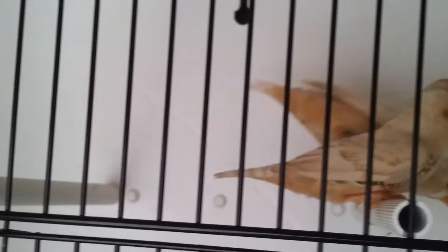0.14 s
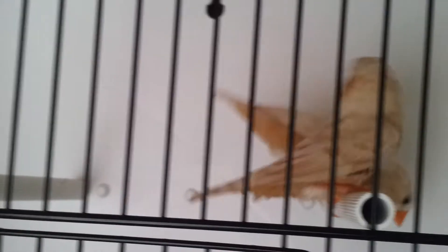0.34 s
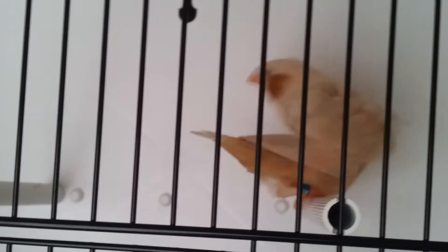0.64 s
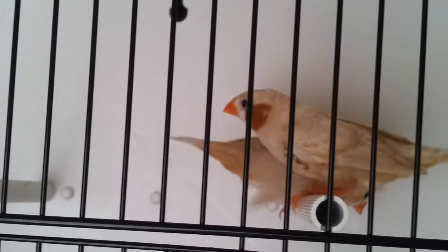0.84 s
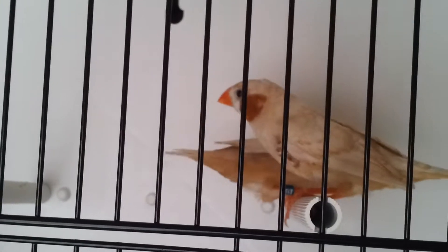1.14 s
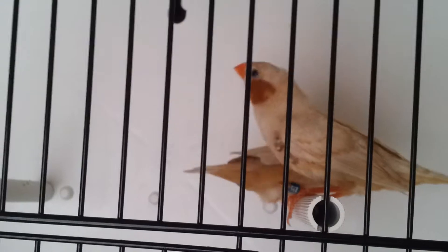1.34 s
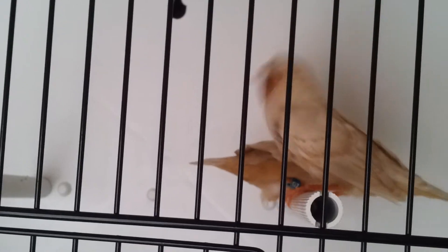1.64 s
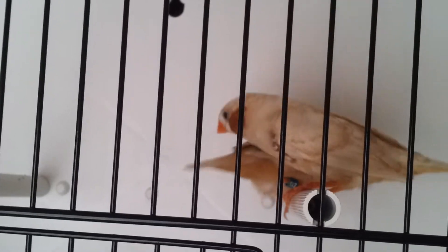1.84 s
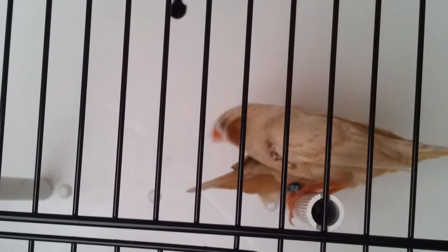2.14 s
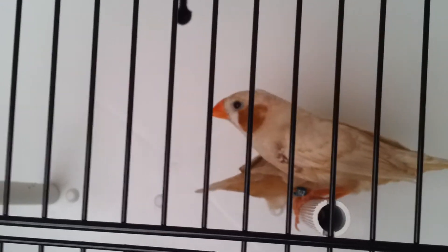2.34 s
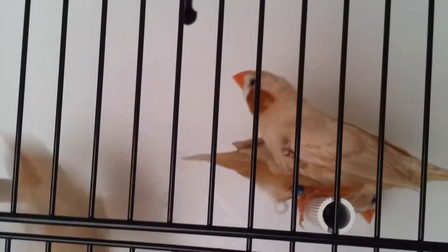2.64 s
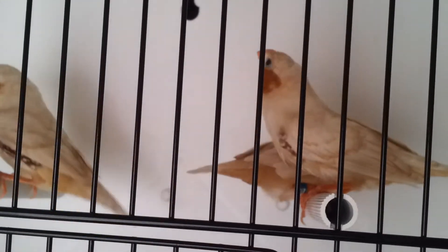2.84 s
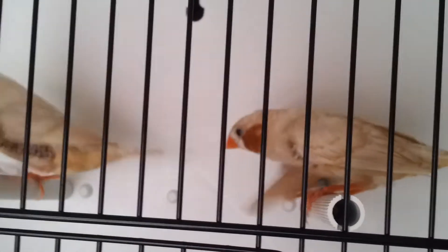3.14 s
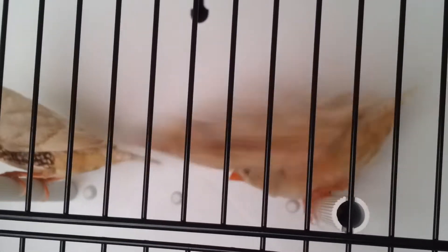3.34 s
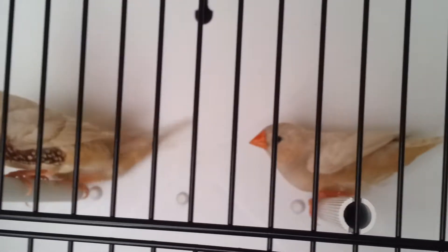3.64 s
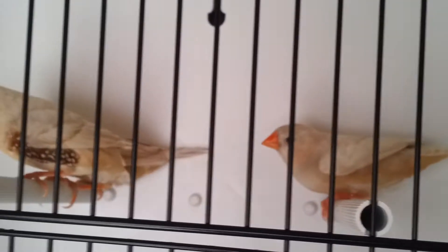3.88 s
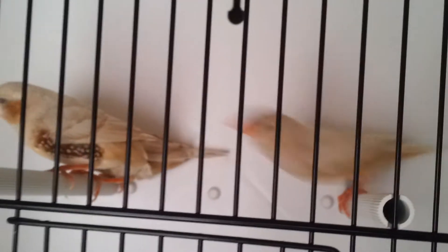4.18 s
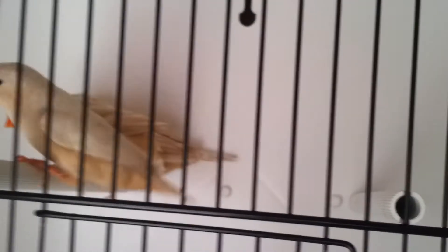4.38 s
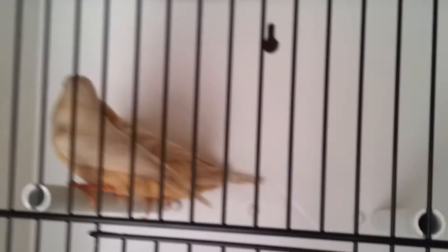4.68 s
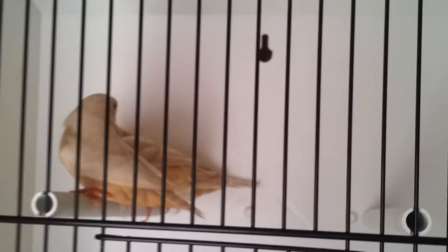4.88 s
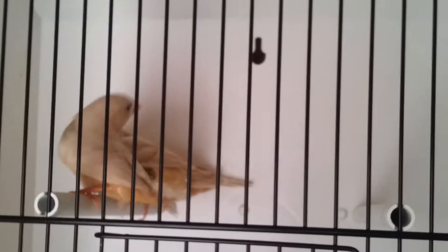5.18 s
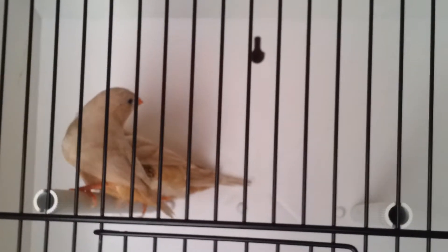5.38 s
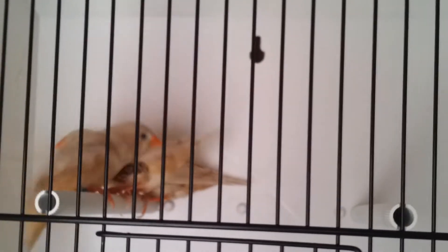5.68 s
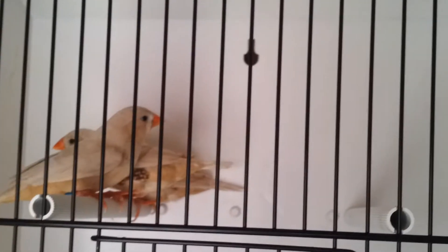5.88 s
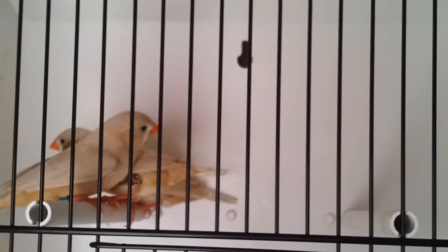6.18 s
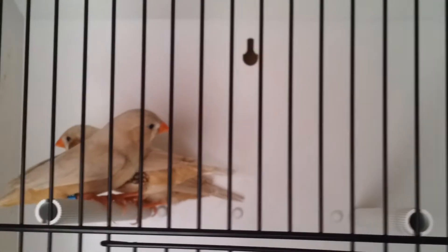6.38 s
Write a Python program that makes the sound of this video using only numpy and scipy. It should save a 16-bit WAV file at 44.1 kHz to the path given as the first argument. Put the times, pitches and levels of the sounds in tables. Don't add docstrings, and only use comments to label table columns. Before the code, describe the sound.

Small birds in a wire cage call nasally and flutter between plastic perches, a shrill young bird begging loudest at the end, close up in a quiet room.

```python
import sys
import numpy as np
from scipy import signal
from scipy.fft import rfft, irfft, next_fast_len
from scipy.io import wavfile
from scipy.ndimage import uniform_filter1d, map_coordinates

SR = 44100
rng = np.random.default_rng(int(sys.argv[2]) if len(sys.argv) > 2 else 0)


def volts(x):
    e = np.asarray(x, float) / 20
    return 10 ** e


def put_to_file(sound):
    columns = np.atleast_2d(sound).T
    safe = np.clip(columns, -1, 1)
    whole_steps = np.round(safe * 32767)
    wavfile.write(sys.argv[1], SR, whole_steps.astype(np.int16))


N = 287532


def unit(x):
    return x / np.sqrt(np.mean(x ** 2) + 1e-20)


def along(points, hz):
    f, v = np.transpose(points)
    return np.interp(np.log(np.abs(hz) + 1), np.log(f + 1), v)


def wobble(rate, size, count=1):
    knots = rng.standard_normal((count, int(size * rate / SR) + 4))
    places = np.arange(size) * rate / SR
    return np.array([map_coordinates(k, [places]) for k in knots])


def noise(size, gain):
    m = next_fast_len(size + 64)
    spectrum = rfft(rng.standard_normal(m)) * gain(np.fft.rfftfreq(m, 1 / SR))
    return unit(irfft(spectrum, m)[:size])


def bump(hz, centre, width, power=2):
    return np.exp(-((hz - centre) / width) ** power)


def spread(rows, fade):
    s, *cols = np.transpose(rows)
    t = np.arange(s[0] - fade / 2, s[-1] + fade / 2, 1 / SR)
    edge = np.clip(np.minimum(t - t[0], t[-1] - t) / fade, 0, 1)
    return round(t[0] * SR), edge, [np.interp(t, s, c) for c in cols]


def add(track, start, sound):
    track[start:start + len(sound)] += sound[:len(track) - start]


# (frequency [Hz], density [dB per Hz])
AIR = [(90, -2), (150, 1), (220, -5.5), (470, -6.5), (560, -11.5), (650, -9), (900, -12.5), (1300, -15),
       (2100, -25), (3300, -24.5), (6000, -24.5), (8500, -27.5), (11700, -26), (15000, -90)]
# (time [s], feather level [dB])
STIR = [(0, -49), (.6, -84), (1.3, -48), (2.9, -56.5), (4.7, -58), (5.1, -66), (5.4, -40), (6.52, -44)]
# (time [s], level [dB], lean from first to second order [dB])
HUM = [(0, -47, 0.5), (.5, -52.5, -1.5), (1.1, -52, 1.5), (2, -51, -1), (2.598, -48, 0), (3.5, -42, -3),
       (4.1, -52.5, -7), (4.8, -51, 8.5), (6.52, -48.5, -1)]
# (frequency [Hz], relative unsteadiness, level [dB], answer to the lean)
HUM_ORDERS = [(40, 0.05, 1.5, -1), (80, 0.045, 1.5, 1), (117, 0.037, -1, 0)]


def background():
    t = np.arange(N) / SR
    out = volts(-47 + 0.25 * wobble(27, N)[0]) * noise(N, lambda f: volts(along(AIR, f)))
    stir_db = np.interp(t, *np.transpose(STIR)) - 4.5 + 4 * wobble(11, N)[0]
    out += volts(stir_db) * noise(N, lambda f: bump(f, 6000, 1500))
    out += volts(-55) * noise(N, lambda f: (f > 18) / (1 + (f / 170) ** 4))
    s, load_db, lean_db = np.transpose(HUM)
    for hz, drift, db, leans in HUM_ORDERS:
        phase = 2 * np.pi * np.cumsum(hz * (1 + drift * wobble(20, N)[0])) / SR
        order_db = np.interp(t, s, load_db + leans * lean_db) + db + 3 * wobble(7, N)[0]
        out += volts(order_db) * np.sin(phase)
    return out


# (frequency [Hz], t60 [s])
ROOM = [(300, 0.35), (2500, 0.16), (10000, 0.016)]


def room(x):
    out, step = np.zeros(N), SR // 8
    for start in range(0, N, step):
        hz, t, z = signal.stft(rng.standard_normal(SR // 3), SR, nperseg=256)
        decay = volts(-60 * t / along(ROOM, hz)[:, None])
        tail = signal.istft(z * decay, SR, nperseg=256)[1]
        add(out, start, signal.fftconvolve(x[start:start + step], tail / np.linalg.norm(tail)))
    return out


# (time [s], peak [dB], low scuff over swish [dB])
RUSTLES = [(0.0144, -16, -4.5), (0.122, -24, -24), (0.379, -32.5, -24), (0.9, -27.5, 1), (0.982, -23, -2),
           (1.1756, -13.5, -2), (1.483, -17, -4.5), (1.769, -31, 9.5), (2.6933, -27, 5.5),
           (2.8702, -29, -20), (3.117, -18.5, -2.5), (3.196, -28, 1), (3.366, -22.5, -14),
           (3.414, -19, -4.5), (3.6113, -32, -31), (3.8278, -26.5, -3.5), (4.2435, -31, -19),
           (4.2749, -27.5, -6), (4.314, -29, -13), (4.362, -29.5, -13), (6.4173, -29, -6)]


def rustles():
    out, t = np.zeros(N), np.arange(SR // 3) / SR
    for s, db, low_db in RUSTLES:
        swish = noise(len(t), lambda f: bump(f, 6800, 3300))
        scuff = noise(len(t), lambda f: bump(f, 1900, 1300))
        onset = 1 - np.exp(-t / 0.0018)
        grain = volts(2.05 * wobble(557, len(t))[0] - 60 * t / 0.17) * onset
        add(out, round(s * SR), volts(db - 16.5) * grain * (swish + volts(low_db) * scuff))
    return out


# (time [s], peak [dB], pitch [Hz])
BUMPS = [(0.049, -30.5, 336), (0.328, -28, 353), (0.708, -22.5, 359), (0.983, -26.5, 298), (1.18, -27, 374),
         (1.485, -31, 326), (1.771, -20.5, 329), (2.666, -22.5, 424), (3.159, -26.5, 415),
         (3.218, -28.5, 367), (3.313, -28.5, 341), (3.441, -21, 400), (3.678, -33.5, 434),
         (3.755, -31.5, 312), (4.16, -32.5, 535), (4.216, -29.5, 370), (4.286, -32, 417), (4.313, -23, 283),
         (4.42, -27, 252), (5.589, -20.5, 375), (5.65, -24, 428), (5.722, -31, 393)]
# (time [s], peak [dB], pitch [Hz], t60 [s])
THUMP = (4.42, -22, 245, .07)


def perches():
    out, t = np.zeros(N), np.arange(SR // 3) / SR
    for s, db, hz in BUMPS:
        thud = noise(len(t), lambda f: bump(f, hz, 75) + 0.52 * bump(f, 370, 110, power=4))
        envelope = volts(db - 6.5 - 60 * t / 0.12) * (1 - np.exp(-t / 0.0046))
        add(out, round(s * SR) - 150, envelope * (thud + 0.68 * np.sin(2 * np.pi * hz * t)))
    s, db, hz, t60 = THUMP
    add(out, round(s * SR), volts(db - 60 * t / t60) * np.sin(2 * np.pi * hz * t))
    return out


# (frequency [Hz], level [dB], t60 [s])
WIRES = [(272, -14, 1.34), (595, -23.5, 0.57), (1182, -5, 0.084), (1450, -42, 0.16), (1857, -37, 0.38)]
# (time [s], peak [dB], share of wire ring [dB])
LANDINGS = [
    (0.983, -8.5, -7.5),
    (4.162, -31, -7),
    (4.313, -19.5, -15),
    (4.421, -15.5, -16),
]


def landings():
    out, t = np.zeros(N), np.arange(SR // 3) / SR
    for s, db, ring_db in LANDINGS:
        ring = np.zeros(len(t))
        for hz, level, t60 in WIRES:
            sway = 0.54 * wobble(28.4, len(t))[0]
            ring += volts(level - 60 * t / t60) * np.sin(2 * np.pi * hz * t + sway)
        crack = 0.38 * volts(-60 * t / 0.058) * noise(len(t), lambda f: 1 / (1 + (f / 1800) ** 2))
        add(out, round(s * SR), volts(db - 7) * (volts(ring_db) * ring + crack))
    return out


def syrinx(rows, throat, rough, strain, beak_db=0, beak_hz=1200):
    start, edge, (pitch, db, *beak) = spread(rows, .008)
    size, pitch = len(edge), uniform_filter1d(pitch, 400, mode="nearest")
    glide = np.abs(np.gradient(np.log(pitch)) * SR)
    rough = np.clip(rough + strain * glide, 0, .6)
    phase = 2 * np.pi * np.cumsum(pitch * (1 + 0.06 * rough * wobble(341, size)[0])) / SR
    k = np.arange(1, 23)[:, None]
    colour = along(throat, k * pitch) + sum(beak_db * bump(k * pitch, hz, beak_hz) for hz in beak)
    drift = (1.6 + k / 6) * wobble(60, size, count=22)
    gains = volts(colour + drift) * (k * pitch < SR / 3)
    tone = np.sum(gains * np.sin(k * phase + k * k / 3), 0) / np.sqrt(np.sum(gains ** 2, 0) / 2)
    breath = noise(size, lambda hz: volts(along(throat, hz))) * (1 + 0.15 * np.cos(phase))
    return start, edge * volts(db) * (np.sqrt(1 - rough) * tone + np.sqrt(rough) * unit(breath))


def arch(top, bend, size=24):
    u = np.linspace(0, 1, num=size)
    return u, np.clip(1 - u / top, 0, 1) ** bend, np.clip((u - top) / (1 - top), 0, 1) ** bend


def arched_call(s, length, top, db, beak):
    u, early, late = arch(0.635, 2.09)
    pitch = top * (1 - (1 - .91) * early - (1 - .94) * late)
    soft = np.clip(1 - length * u / 0.017, 0, 1)
    return np.transpose([s + length * u, pitch, db - 4 * soft - 15 * late, beak + 0 * u])


# (time [s], length [s], top pitch [Hz], level [dB], beak resonance [Hz])
MATES = [(0.057, 0.073, 563.5, -33, 2500), (0.652, .07, 561.6, -33.5, 3060), (0.896, 0.077, 526, -33, 3940),
         (3.04, 0.062, 530, -54.5, 2110), (3.235, 0.044, 545, -37.5, 2820),
         (3.745, 0.082, 529.7, -33.5, 2850), (4.994, 0.096, 570, -40.5, 3450),
         (5.247, 0.1, 530.4, -36, 3200)]
# (frequency [Hz], gain [dB])
MATE_THROAT = [(280, -37), (530, -10), (1060, -5.5), (1600, -7.5), (2700, -3.5), (4300, -6.5), (5500, -3.5),
               (7500, -19.5), (11700, -36.5), (15000, -70)]


def mates():
    out = np.zeros(N)
    for row in MATES:
        add(out, *syrinx(arched_call(*row), MATE_THROAT, rough=0.052, strain=0.026,
                         beak_db=10.5, beak_hz=1070))
    return out


def cry(row, top, soft_db, fade_db, bend, lead_db, sag, sag_share=.22):
    s, length, db, upper_db, hz = row
    u, early, late = arch(top, bend)
    pitch = hz * (1 - sag * np.tanh((u - top) / sag_share))
    level = db - soft_db * early - fade_db * late
    return np.transpose([s + length * u, level, upper_db + lead_db * early, pitch])


# (frequency [Hz], density [dB per Hz])
HARSH = [(470, -45), (800, -37), (1060, -15.5), (1450, -4.5), (1790, -12), (3110, 2), (3360, 7.5),
         (5200, 3), (11700, -27.5), (15200, -83), (22000, -120)]


def screech(rows, scale, jitter, sag, gap_db, hiss_db, half_db, low_db=0):
    start, edge, (db, upper_db, hz) = spread(rows, .014)
    size = len(edge)
    snaps = np.cumsum(45 * volts(2.8 * wobble(39, size)[0])) / SR % 1
    slips = sag * (.5 - snaps) + jitter * wobble(489.3, size)[0]
    phase = 2 * np.pi * np.cumsum(hz * scale * (1 + slips)) / SR
    puffs = volts(1.2 * wobble(150, size)[0]) * (1 + .7 * np.cos(phase / 5))

    def line(order):
        gaps = volts(-gap_db * wobble(225.4, size)[0] ** 2)
        return unit(gaps * np.sin(order * phase))

    def hiss(side):
        return volts(hiss_db) * unit(puffs * noise(size, lambda f: volts(along(HARSH, f)) * side(f)))

    def below(f):
        return 1 / (1 + (f / 4000) ** 8)

    low = volts(low_db) * line(1) + volts(half_db) * line(1.5) + volts(half_db - 14) * line(.5)
    low += hiss(below)
    high = line(2) + volts(half_db - 5) * line(2.5) + volts(-18) * line(3)
    high += hiss(lambda f: 1 - below(f))
    return start, edge * volts(db) * (unit(low) + volts(upper_db) * unit(high))


# (time [s], length [s], level below 4 kHz [dB], overtone band over it [dB], pitch [Hz])
HOARSE = [(1.13, 0.037, -35.5, -8, 3260), (1.195, 0.1, -26, -27, 3030), (1.877, 0.064, -29.5, -12, 2930),
          (2.256, 0.059, -25.5, -5.5, 3360), (2.558, 0.067, -32.5, -7.5, 2930),
          (2.918, 0.06, -25.5, -7, 2980), (3.11, 0.034, -28.5, -14, 3730), (3.27, 0.065, -21, -8, 3020),
          (4.586, 0.02, -19, -30, 2656), (4.811, 0.069, -27.5, -9.5, 3040),
          (5.096, 0.065, -30, -12.5, 3214), (5.35, 0.078, -29.5, -6.5, 3176),
          (5.411, 0.061, -30.5, -9, 3510), (6.054, 0.049, -19, -10, 3530)]


def hoarse_notes():
    out = np.zeros(N)
    for row in HOARSE:
        rows = cry(row, top=0.37, soft_db=15, fade_db=25.5, bend=1.43, lead_db=4, sag=0.022)
        add(out, *screech(rows, 1, jitter=.022, sag=.04, gap_db=4, hiss_db=1, half_db=-4))
    return out


# (time [s], length [s], level below 4 kHz [dB], overtone band over it [dB], overtone [Hz])
BEGS = [(1.604, 0.12, -46.5, 10, 4830), (1.83, 0.08, -44, 14, 5560), (0.235, 0.091, -25.5, 1.5, 5100),
        (0.596, 0.11, -26.5, 3, 5210), (1.481, 0.15, -30, 7.5, 5100), (1.942, 0.091, -23.5, -1, 5234),
        (2.46, 0.1, -23, 0.5, 5226), (3.884, 0.088, -29, 6.5, 5620), (5.02, 0.086, -37, 7.5, 5510),
        (5.397, 0.16, -29.5, 0, 5730), (5.472, 0.089, -21, 12.5, 5620), (5.69, 0.11, -25.5, 10.5, 5350),
        (5.909, 0.13, -25, 14.5, 5506), (6.239, 0.12, -22.5, 14, 5600)]


def fledglings():
    out = np.zeros(N)
    swell = dict(top=0.35, soft_db=14.5, fade_db=31, lead_db=1)
    for row in BEGS[:10]:
        rows = cry(row, bend=1.66, sag=.12, **swell)
        add(out, *screech(rows, .5, jitter=.035, sag=.08, gap_db=7, hiss_db=-2, half_db=-6, low_db=-2))
    for row in BEGS[10:]:
        rows = cry(row, bend=1.96, sag=.05, **swell)
        add(out, *screech(rows, .5, jitter=.035, sag=.07, gap_db=5, hiss_db=-6, half_db=-11, low_db=-8))
    return out


def falling_note(s, length, held, top, db):
    t = np.linspace(0, length, num=40)
    early, late = np.clip(1 - t / .009, 0, 1), np.clip(t - held, 0, 1)
    broken = (t - held) / .004
    dip_db = 4 * np.exp(-broken ** 2)
    slide_db = 6 * (1 + np.tanh(broken + 1)) / 2
    fade_db = 60 * late
    pitch = top * (1 - (1 - .96) * early) * np.exp(-10.3 * late)
    return np.transpose([s + t, pitch, db - 12 * early - (dip_db + slide_db + fade_db)])


# (time [s], length [s], held [s], held pitch [Hz], level [dB])
FALLS = [
    (1.308, 0.05, .02, 938, -8.5),
    (1.359, 0.083, .023, 939, -9.5),
    (4.426, 0.044, .018, 914, -10),
    (4.479, .082, .019, 919, -11.5),
]
# (frequency [Hz], gain [dB])
FALL_THROAT = [(500, -28), (900, -24.5), (1850, -24.5), (2750, -11.5), (3700, -2.5), (4600, -7.5),
               (5500, -6), (6500, -23), (8000, -35.5), (11500, -36.5), (15000, -103)]


def falling_notes():
    out = np.zeros(N)
    for row in FALLS:
        add(out, *syrinx(falling_note(*row), FALL_THROAT, rough=.06, strain=.013))
    return out


def nasal_call(s, length, held, top, db):
    t = np.linspace(0, length, num=40)
    early, late = np.clip(1 - t / .065, 0, 1) ** 2, np.clip(t - held, 0, 1)
    release = np.clip(1 - (length - t) / 0.021, 0, 1)
    waver = 4 * uniform_filter1d(rng.standard_normal(len(t)), size=3)
    level = db + waver - 9.5 * early - 80 * late - release
    pitch = top * (1 - (1 - .83) * early) - 470 * late
    return np.transpose([s + t, pitch, level])


# (time [s], length [s], held until [s into the call], top
# pitch [Hz], level [dB])
NASAL = [(1.173, 0.067, 0.036, 579, -23.5), (1.234, 0.077, 0.042, 620.6, -18.5),
         (1.591, 0.14, 0.071, 542, -31), (1.801, .085, 0.053, 564.5, -33.5), (2.095, 0.19, 0.1, 614, -20),
         (3.92, 0.17, 0.092, 615.4, -19.5), (4.518, 0.25, 0.11, 583.5, -24),
         (5.586, 0.173, .125, 611.6, -19.5)]
# (time [s], length [s], top pitch [Hz], level [dB], beak resonance [Hz])
ARCHES = [
    (4.018, 0.081, 596, -19.5, 3550),
    (5.778, 0.11, 587, -30, 4800),
    (6.095, .19, 615, -24.5, 5100),
    (6.426, 0.12, 579, -35, 5060),
]
# (frequency [Hz], gain [dB])
THROAT = [(300, -48), (600, -26.5), (1200, -16.5), (1800, -16.5), (2400, -12), (3000, 3), (3600, -3),
          (4250, 5), (4850, -7), (6000, -12.5), (7600, -24.5), (9500, -19), (11700, -40.5), (15000, -75)]


def adults():
    out = np.zeros(N)
    for row in NASAL:
        add(out, *syrinx(nasal_call(*row), THROAT, rough=.06, strain=.055))
    for row in ARCHES:
        add(out, *syrinx(arched_call(*row), THROAT, rough=0.061, strain=0.037, beak_db=4, beak_hz=875))
    return out


def scene():
    cage = rustles() + perches() + landings()
    birds = mates() + hoarse_notes() + fledglings() + falling_notes() + adults()
    near = cage + birds
    return (near + volts(-12.5) * room(near) + background())[None]


def band_limit(x):
    return signal.sosfilt(signal.butter(12, 11810, fs=SR, output="sos"), x)


def record(dry):
    level = np.sqrt(np.abs(uniform_filter1d(dry ** 2, 1500)))
    ducked = dry / (2.5 + (level / 0.4) ** 2) ** 0.27
    ceiling = .8
    rounded = ducked / (1 + (ducked / ceiling) ** 6) ** (1 / 6)
    return band_limit(rounded)


dry = scene()
out = record(dry)
put_to_file(out)
```